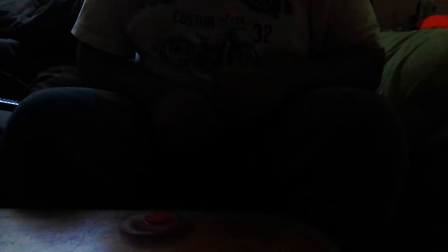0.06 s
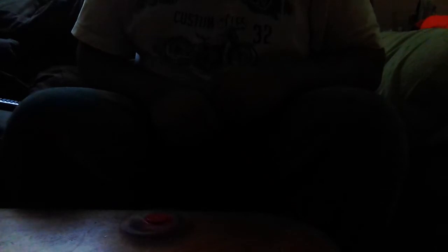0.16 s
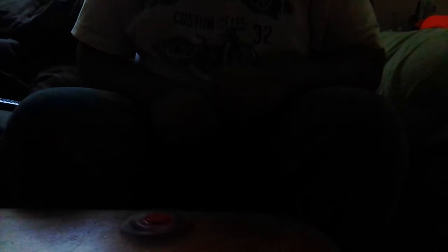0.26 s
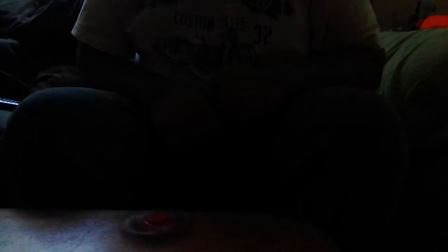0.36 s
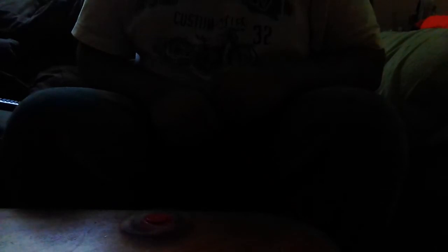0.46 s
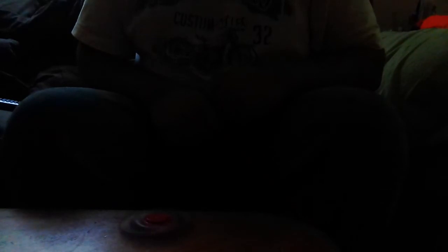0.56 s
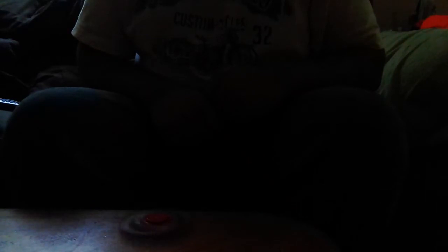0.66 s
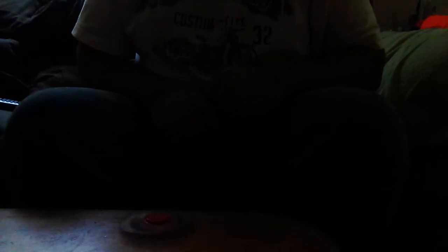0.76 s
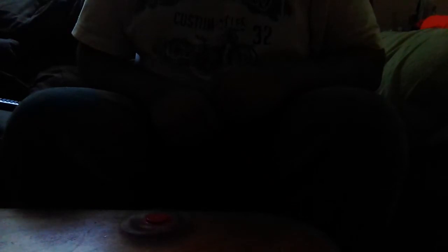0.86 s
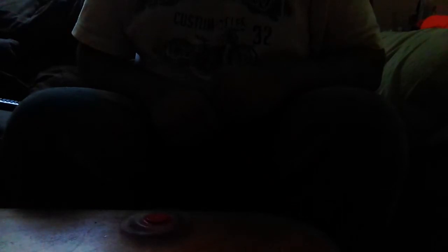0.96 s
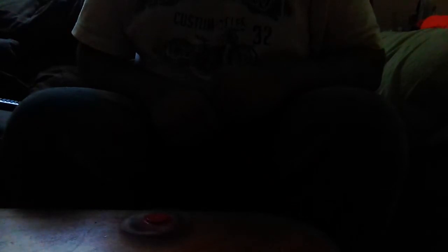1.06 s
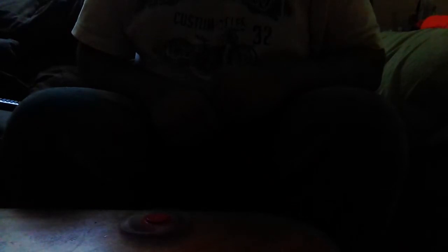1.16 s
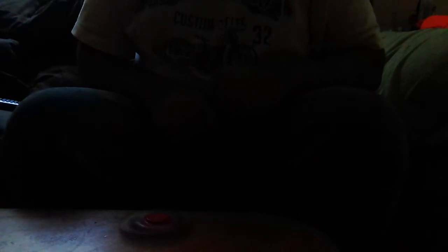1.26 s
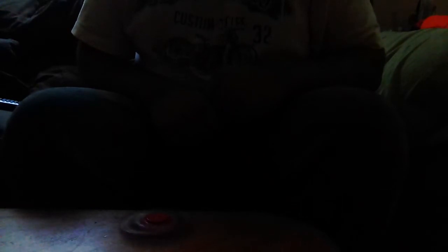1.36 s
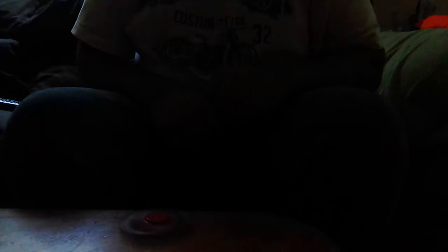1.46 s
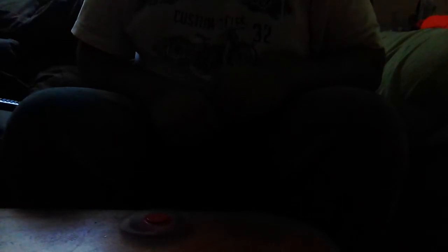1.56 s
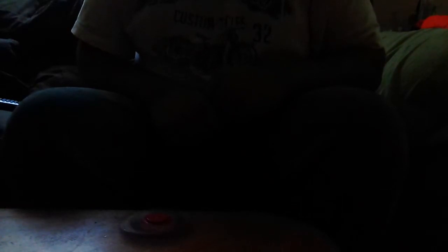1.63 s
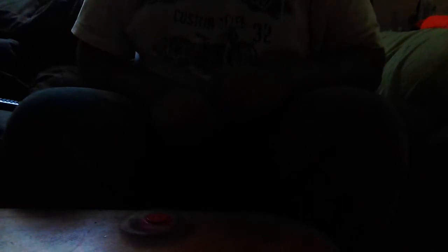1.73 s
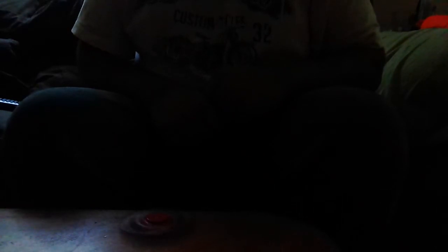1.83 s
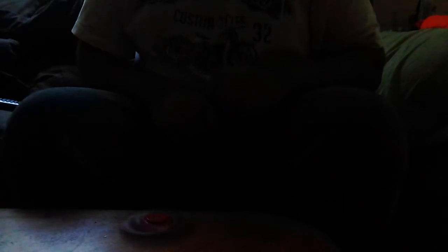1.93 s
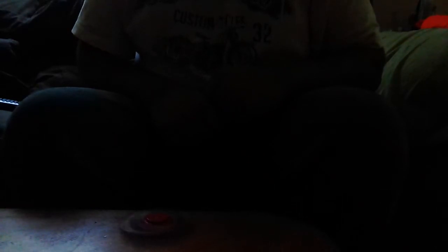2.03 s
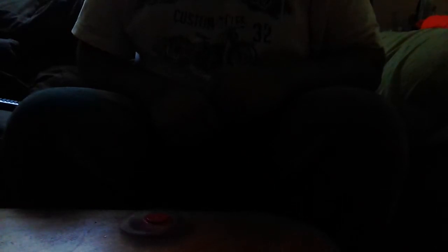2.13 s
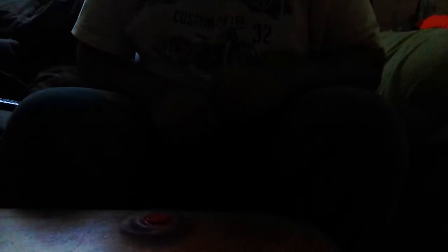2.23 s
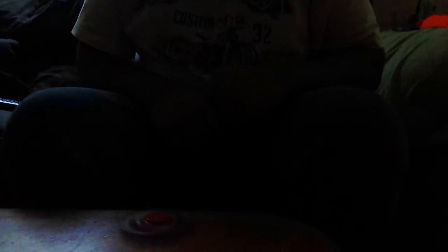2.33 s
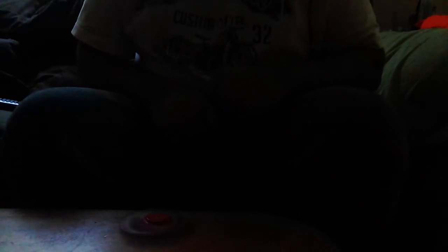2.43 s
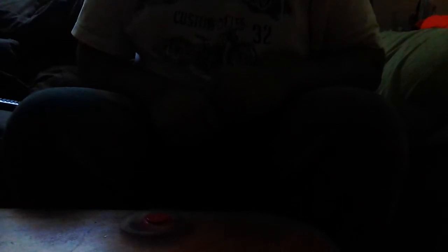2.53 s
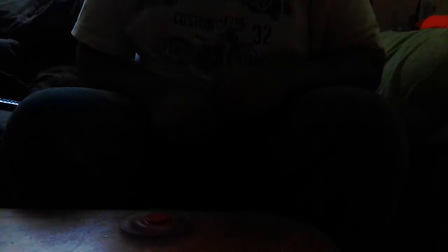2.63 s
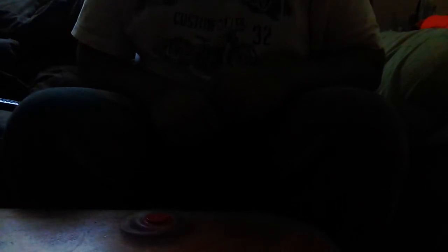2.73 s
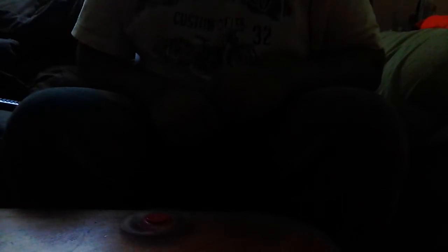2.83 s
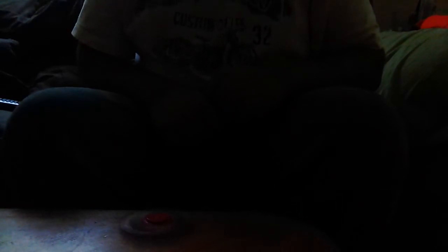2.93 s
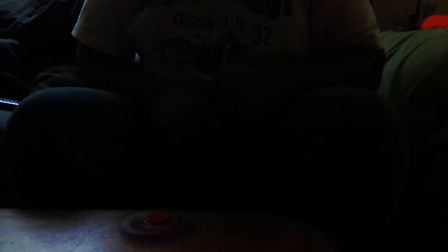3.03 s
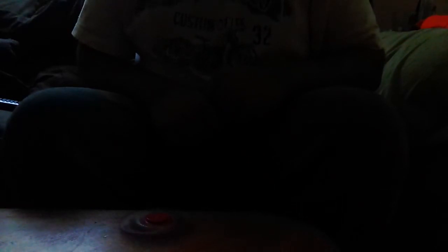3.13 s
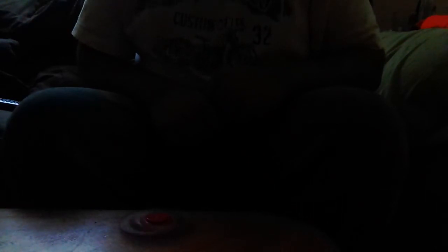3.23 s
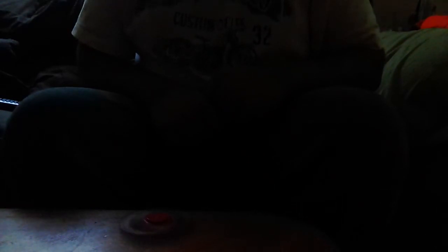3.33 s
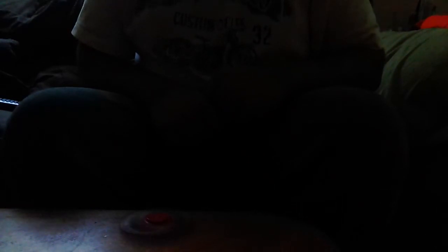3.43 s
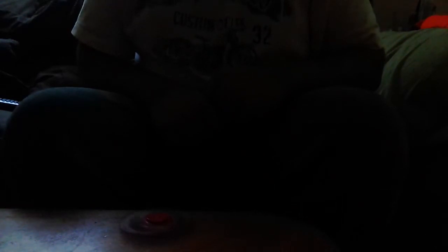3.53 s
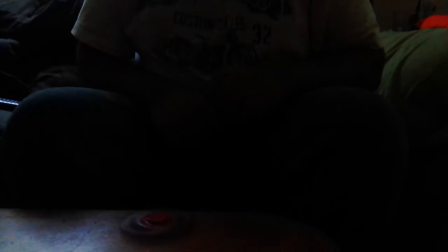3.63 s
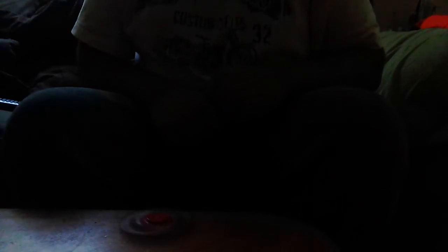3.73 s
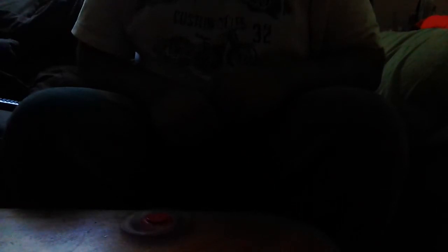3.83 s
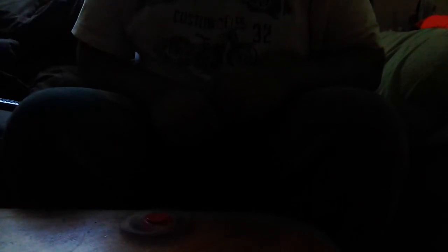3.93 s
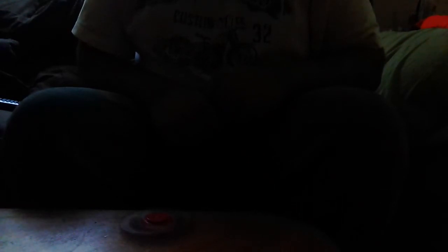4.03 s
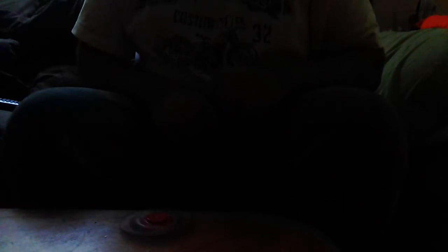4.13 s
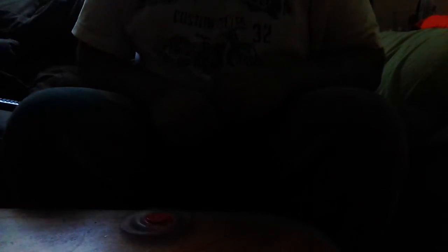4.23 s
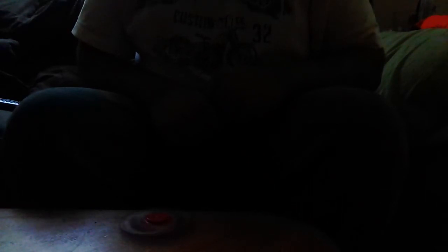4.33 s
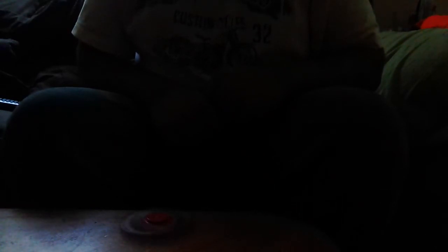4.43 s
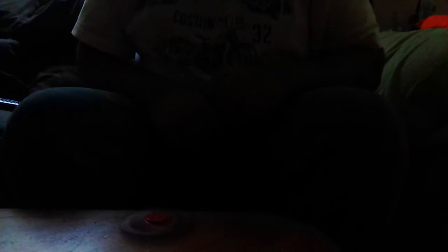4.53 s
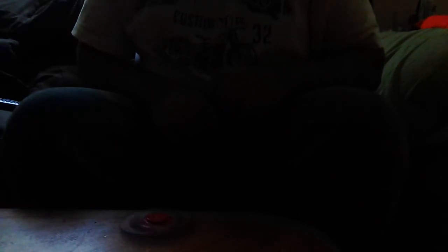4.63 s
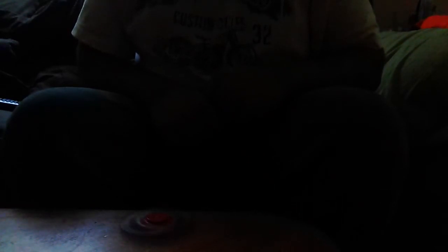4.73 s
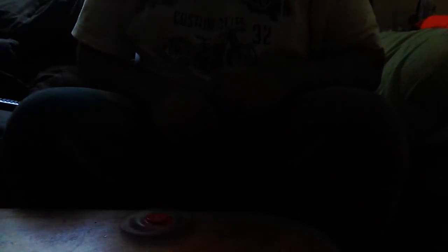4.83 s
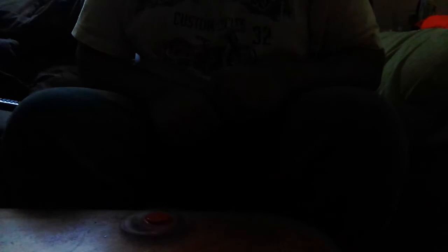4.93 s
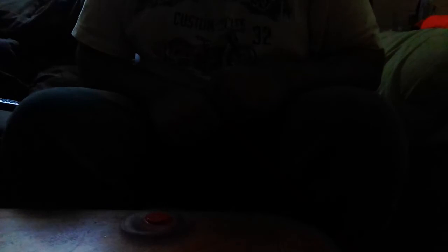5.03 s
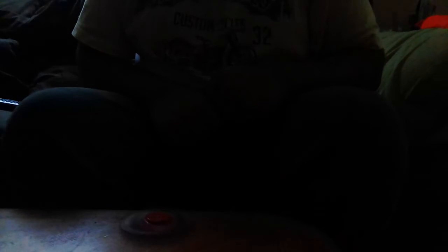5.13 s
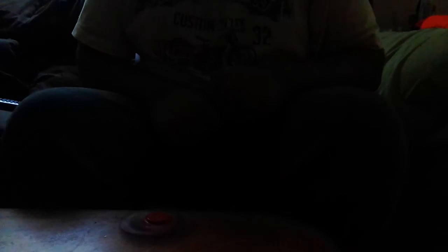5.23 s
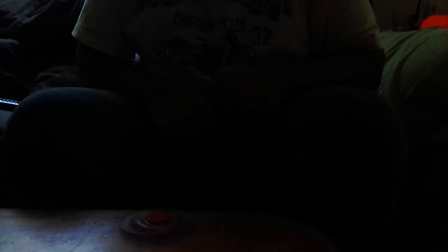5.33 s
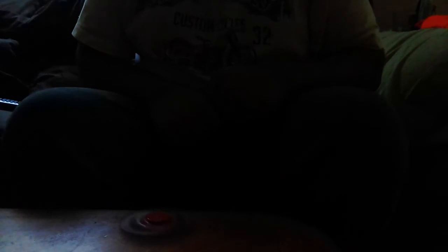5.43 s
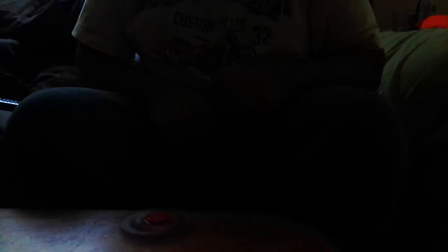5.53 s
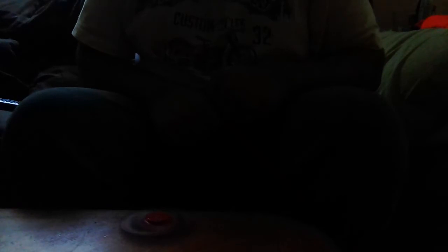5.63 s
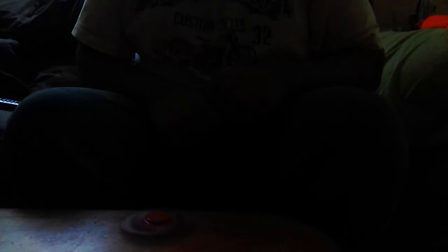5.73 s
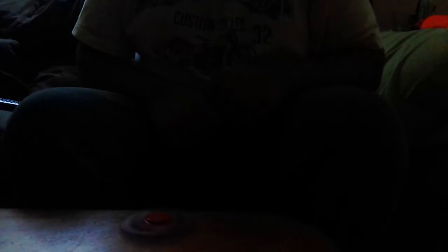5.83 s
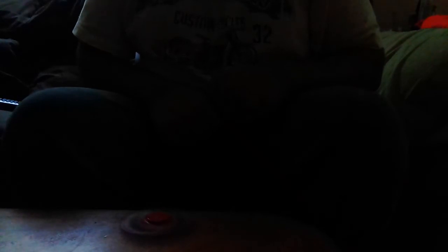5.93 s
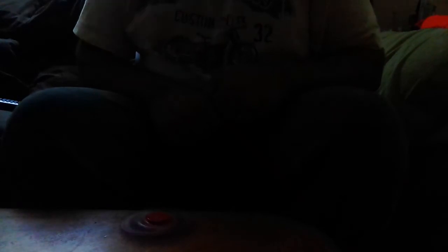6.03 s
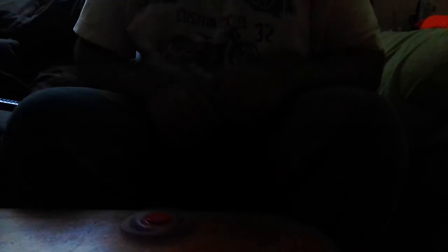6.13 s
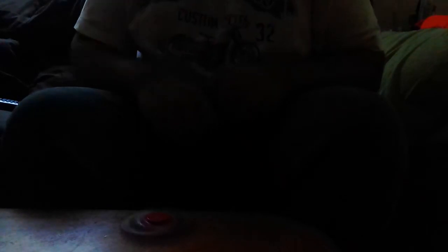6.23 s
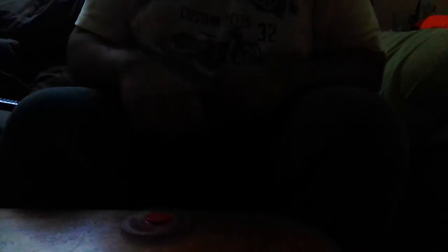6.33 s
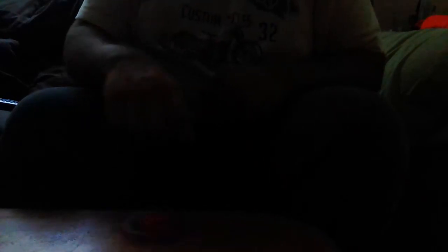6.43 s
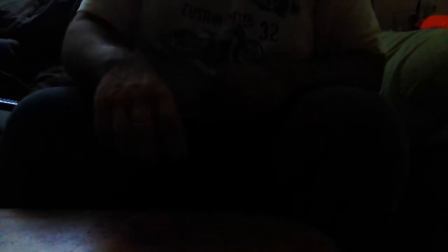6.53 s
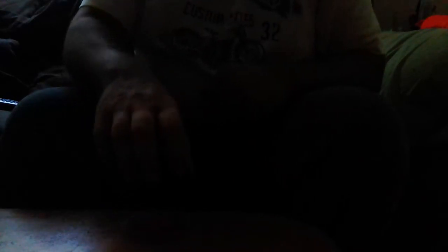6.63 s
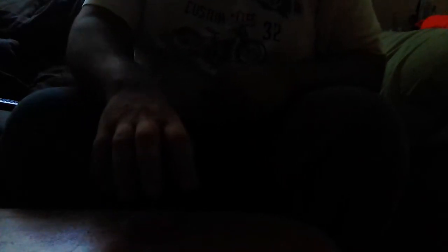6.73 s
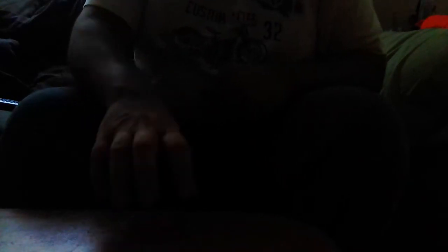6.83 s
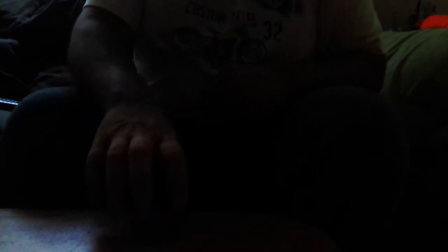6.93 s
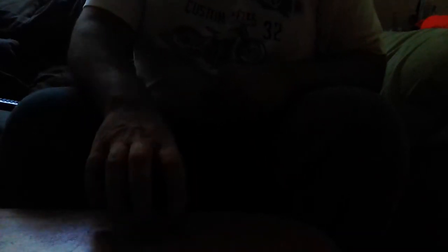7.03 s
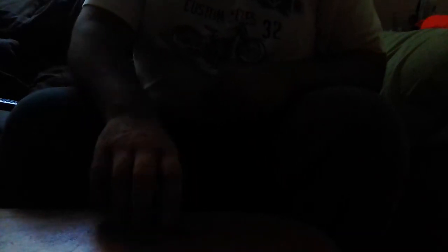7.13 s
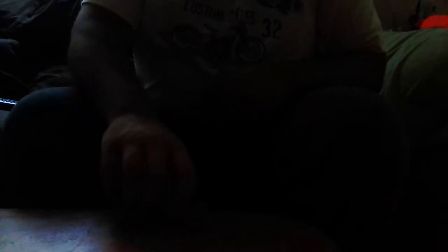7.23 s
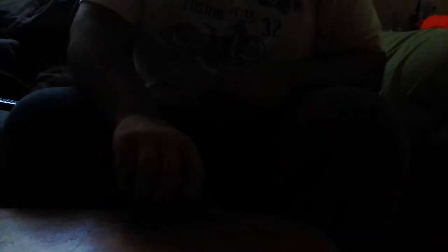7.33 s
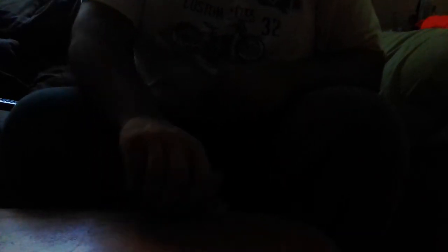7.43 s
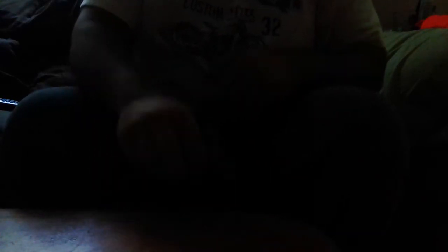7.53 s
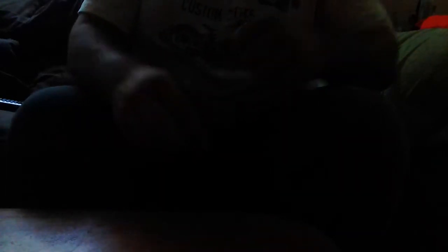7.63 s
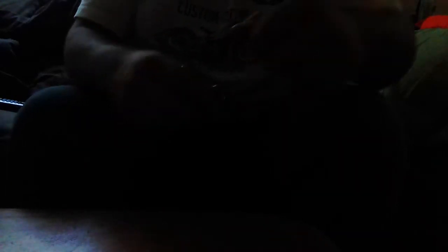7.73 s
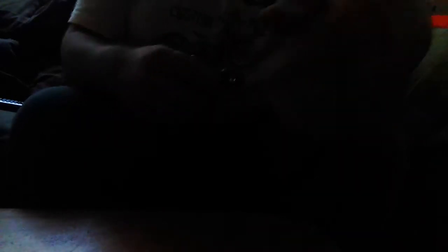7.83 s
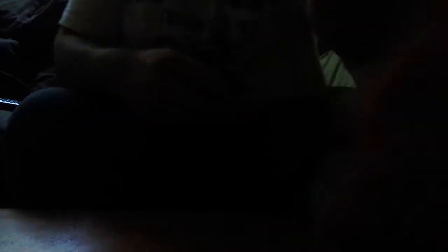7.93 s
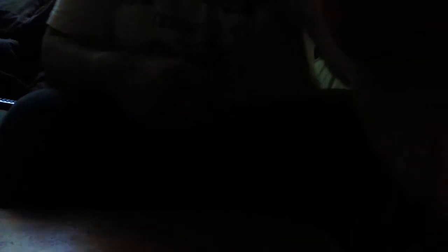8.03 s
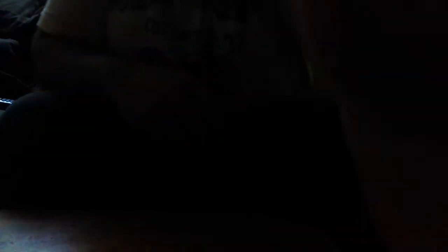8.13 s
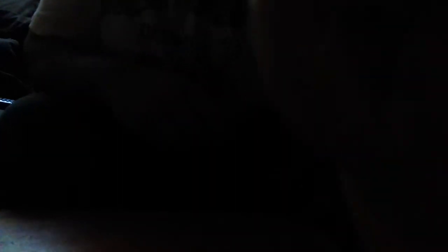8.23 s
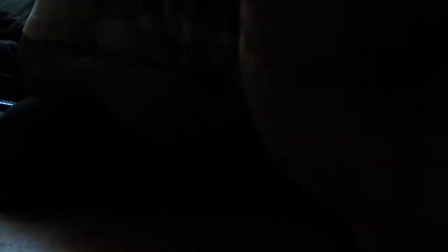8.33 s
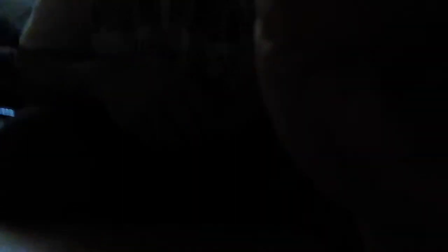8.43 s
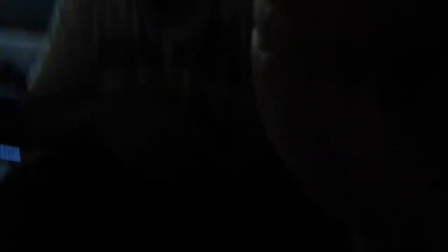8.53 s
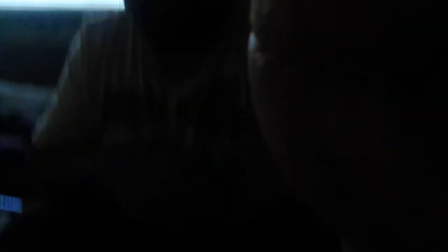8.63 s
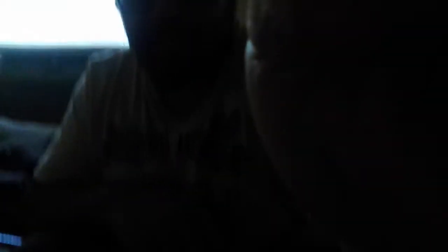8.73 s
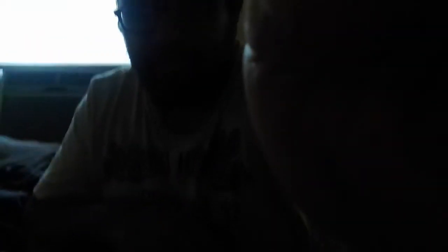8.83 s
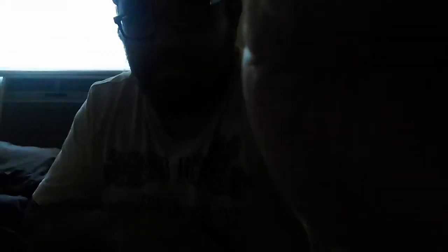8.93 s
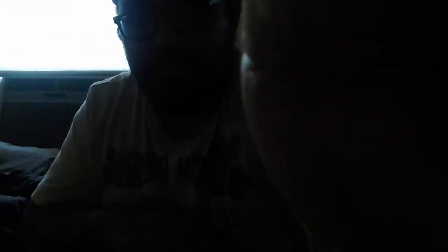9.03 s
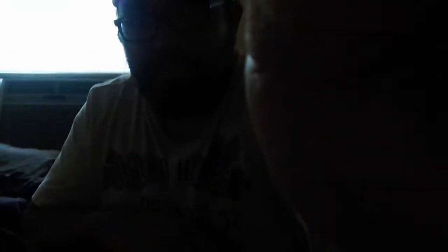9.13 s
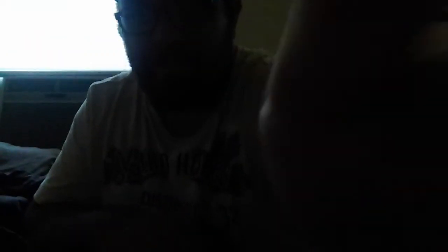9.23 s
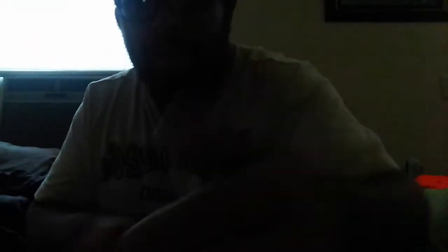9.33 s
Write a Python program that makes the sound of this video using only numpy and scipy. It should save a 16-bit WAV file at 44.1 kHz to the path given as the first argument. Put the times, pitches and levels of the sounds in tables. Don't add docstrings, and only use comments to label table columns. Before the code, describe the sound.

From 0 to about 7.2 seconds a toy spinner runs on a wooden table close to the microphone: a dry, grainy midrange whir of rattling balls, strongest around three kilohertz, throbbing about thirteen times a second at first and eleven by the end. It fades slightly and loses some brightness, with small plastic ticks and soft woody bumps standing out irregularly, and a slight extra touch near 5.7. At 7.19 a loud, sharp plastic knock cuts the whir instantly. The toy rocks and chatters until 7.3, then judders and scrapes over the wood, with another bright clack at 7.4 and a smaller one at 7.53. By 7.8 there is only subdued room air, low hum and a faint high whine. From 8.4 to 8.85 quiet taps, rubs and creaks come from fingers gripping the camera, with a few dull bumps again around 9.25 to 9.35.

```python
import sys
import numpy as np
from scipy import signal
from scipy.fft import rfft, irfft, next_fast_len
from scipy.io import wavfile
from scipy.ndimage import map_coordinates

SR = 44100
rng = np.random.default_rng(int(sys.argv[2]) if len(sys.argv) > 2 else 0)


def to_wav(sig):
    pcm = np.clip(np.atleast_2d(sig), -1, 1) * 32767
    pcm = np.round(pcm).astype(np.int16)
    wavfile.write(sys.argv[1], SR, pcm.T)


def how_loud(loudness_db):
    steps = np.asarray(loudness_db, float) / 20
    return 10 ** steps


N = 412776
TIME = np.arange(N) / SR


def unit(x):
    return x / np.sqrt(np.mean(x ** 2) + 1e-20)


def along(points, hz):
    f, *cols = np.transpose(points)
    return [np.interp(np.log(hz + 1), np.log(f + 1), c) for c in cols]


def curves(rows):
    s, *cols = np.transpose(rows)
    return [np.interp(TIME, s, c) for c in cols]


def wobble(rate):
    knots = rng.standard_normal(int(N * rate / SR) + 4)
    return map_coordinates(knots, [TIME * rate])


def coloured(x, shape_db):
    m = 2 * next_fast_len(N // 2 + 4096)
    gain = how_loud(shape_db(np.fft.rfftfreq(m, 1 / SR)))
    cepstrum = irfft(np.log(gain + 1e-7), m)
    cepstrum[1:m // 2] *= 2
    cepstrum[m // 2 + 1:] = 0
    return irfft(rfft(x, m) * np.exp(rfft(cepstrum)), m)[:N]


def through(x, spectrum):
    return coloured(x, lambda hz: along(spectrum, hz)[0])


def gritty(rate, spike_db, share):
    hits = rng.random(N) < rate / SR
    strength = how_loud(spike_db * np.clip(rng.standard_normal(N), -2, 2))
    contacts = hits * strength * rng.choice([-1, 1], N)
    return rng.standard_normal(N) + share * unit(contacts)


# (time [s], level [dB])
KNOCK = (7.18665, -8)
# (frequency [Hz], density [dB per Hz])
BEARING = [(88, -58.5), (150, -33), (310, -10), (409, -10), (452, -3), (634, -12), (942, -6.5), (1660, -6),
           (2140, -9.5), (2500, -6), (3090, 1), (3460, -2.5)]
RACE = [(4300, -12), (4500, -20), (5100, -13.5), (6150, -9.5), (6700, -19.5), (7300, -29.5), (7600, -42),
        (8000, -45.5), (8500, -39.5), (9150, -29.5), (9700, -50), (11500, -51.5), (13000, -83)]
# (frequency [Hz],
# width [Hz], # lift [dB])
MODES = [(355, 40, 3.5), (700, 14, 4.7), (754, 60, 1.4), (921, 28, 2.4), (953, 20, 5.3), (1125, 20, 2.0),
         (1163, 60, 3.6), (1270, 60, 3.6), (1340, 20, 2.1), (1486, 14, 3.1), (1529, 14, 3.3),
         (1604, 14, 2.4), (1663, 60, 3.5), (1873, 14, 2.1),
         (1916, 20, 5.3), (1981, 60, 2.8), (2040, 20, 5.5), (2234, 14, 2.6), (2272, 14, 2.9),
        (2331, 28, 4.8), (2390, 14, 5.8), (2428, 14, 2.5), (2439, 14, 6.1), (2514, 14, 7.1),
        (2649, 20, 4.3), (2735, 14, 1.9), (2767, 60, 4.8), (2848, 14, 1.9), (3025, 20, 4.9),
         (3106, 14, 2.1), (3155, 40, 2.9), (3219, 14, 2.5), (3316, 20, 1.6), (3332, 14, 4.2), (3354, 60, 2.8),
       (3375, 14, 3.4), (3408, 14, 2.8), (3440, 20, 3.8), (3483, 14, 2.3), (3666, 40, 2.0), (3817, 28, 2.6),
       (3908, 90, 3.4), (3967, 20, 2.5), (4016, 28, 2.0),
         (528, 20, -4.0), (824, 40, -4.5), (1464, 14, -4.8), (1760, 28, -4.5), (2250, 14, -3.6),
           (2358, 20, -2.2), (2476, 14, -4.9), (2595, 28, -3.5), (2885, 40, -3.0), (3085, 14, -5.9),
           (3192, 14, -6.6), (3252, 20, -4.3), (3295, 14, -3.3), (3542, 20, -2.4),
         (445, 22, 3), (1250, 20, 2.5), (2762, 14, 2.5), (3122, 14, -3.5)]


def resonances(whir):
    modes = MODES
    knots = rng.standard_normal(SR // 25)

    def shape_db(hz):
        modes_db = sum(1.15 * db / (1 + (2 * (hz - centre) / width) ** 4) for centre, width, db in modes)
        grain_db = .9 * map_coordinates(knots, [hz / 13])
        return modes_db + grain_db

    ringing = coloured(whir, shape_db)
    return ringing * np.std(whir) / np.std(ringing)


SPIN_HZ, SLOWING, FIRST_TURN = 13, .286, -.59
BALL_ORDER = 2.63
# (frequency [Hz], depth [dB], lead [turns])
THROB = [(400, 1.2, -.12), (750, .8, 0), (1050, 1.8, .02), (1350, 1.6, .05), (1650, 2.8, .05),
         (2200, .9, -.02), (2850, .6, -.02), (3150, 1.7, .03), (3450, 4.6, .06), (4250, 5.4, .05),
         (4700, 1, 0), (5400, .6, -.4), (6300, .5, -.05), (9000, 1.2, .4)]
# (time [s], share [1])
UNBALANCE = [(0, 1.1), (.7, .85), (1.2, .85), (2, 1), (2.8, 1.25), (3.8, 1), (4.7, 1.1), (5.3, .7),
             (6.1, .7), (7.2, .75)]


def rotation_db(hz, t):
    turns = FIRST_TURN + SPIN_HZ * t - SLOWING * t * t / 2
    depth_db, lead = [c[:, None] for c in along(THROB, hz)]
    angle = 2 * np.pi * (turns + lead)
    share = np.interp(t, TIME, curves(UNBALANCE)[0])
    throb_db = depth_db * share * (np.cos(angle) - .3 * np.cos(2 * angle))
    lobes_db = .8 * (hz[:, None] > 4500) * np.cos(2 * np.pi * (3 * turns - .2))
    balls_db = 0.75 * (hz[:, None] < 2500) * np.cos(2 * np.pi * (BALL_ORDER * turns + 0.48))
    return throb_db + lobes_db + balls_db


# (time [s], level [dB])
WHIR = [(0, -43), (.4, -44), (1.2, -44.5), (2.2, -45.5), (3.6, -44.5), (4.1, -46), (5.2, -47), (5.7, -46),
        (7.17, -47)]
# (level over the load [dB], share of load swings [1], loss [dB per turn/s lost])
PARTS = [
    (-6, 0.79, -0.2),
    (-2, 1, 0.5),
    (-9, 0.39, 1.2),
    (-32, 0.83, 2.5),
]


def bearing():
    load_db = curves(WHIR)[0]
    mean_db = np.mean(np.transpose(WHIR)[1])
    lost = SLOWING * (TIME - KNOCK[0] / 2)
    rattle = gritty(1500, 3.5, 0.78) * how_loud(0.096 * wobble(35) + 0.88 * wobble(90))
    hz, t, z = signal.stft(through(rattle, BEARING + RACE), SR, nperseg=256, noverlap=192)
    z = z * how_loud(rotation_db(hz, t))
    part = np.digitize(hz, [2400, 4400, 7500])
    whir = 0
    for k, (db, share, loss_db) in enumerate(PARTS):
        layer = signal.istft(z * (part == k)[:, None], SR, nperseg=256, noverlap=192)[1][:N]
        level_db = mean_db + db + share * (load_db - mean_db) - loss_db * lost
        whir = whir + how_loud(level_db) * unit(layer)
    return resonances(whir) * np.clip((KNOCK[0] - TIME) / 0.0034, 0, 1)


# (frequency [Hz], level [dB], t60 [s])
PLASTIC = [(1230, -7.5, 0.018), (1940, -24, 0.0792), (2676, -19.5, 0.0451), (3310, 0, 0.0064),
           (3846, -19, 0.05), (6000, -17.5, .008)]


def knock():
    t = np.clip(TIME - KNOCK[0], 0, None)
    ring = sum(how_loud(db - 60 * t / t60) * np.sin(2 * np.pi * hz * t) for hz, db, t60 in PLASTIC)
    burst = how_loud(-60 * t / 0.024) * (t > 0) * rng.standard_normal(N)
    crack = through(burst, BEARING + RACE)
    return how_loud(KNOCK[1] + 1) * (1 - np.exp(-t / 0.00024)) * (ring + 0.1199 * crack)


# (time [s], level [dB], frequency [Hz])
TABLE_THUDS = [(0.381, -42, 110), (5.65, -57, 200), (7.18, -28, 600), (7.187, -30, 189), (7.186, -25, 480),
               (7.19, -38, 91.5), (7.202, -30, 205), (7.384, -45, 98), (7.399, -24, 1120),
               (7.531, -30, 800), (7.657, -46.5, 738)]
GRIP_THUDS = [(8.437, -49.5, 890), (8.441, -57, 373), (8.526, -56, 648), (8.547, -48, 1100),
              (8.658, -47, 626), (8.783, -46, 485), (9.241, -43, 1074), (9.2702, -39.5, 337),
              (9.27, -51, 590), (9.289, -45, 217), (9.33, -49, 400)]


def thuds():
    t, out = np.arange(SR // 6) / SR, np.zeros(N + SR)
    modes = [(.78, 0.24), (1, 0.57), (1.3, 0.22), (1.9, 0.21), (2.7, 0.091)]
    for s, db, hz in TABLE_THUDS + GRIP_THUDS:
        ring = sum(g * np.sin(2 * np.pi * k * hz * t) for k, g in modes)
        t60 = 0.033 * (500 / hz) ** 0.71
        out[round(s * SR):][:len(t)] += how_loud(db - 60 * t / t60) * (1 - np.exp(-t / 0.00081)) * ring
    return out[:N]


# (time [s], level [dB], frequency [Hz])
TABLE_TICKS = [(5.65, -50, 5200), (7.18, -39, 4500), (7.187, -48.5, 8500), (7.212, -31, 5260),
               (7.24, -35, 4900), (7.264, -30, 5500), (7.283, -38, 6000), (7.297, -41, 6500),
               (7.338, -46, 6040), (7.379, -38, 5000), (7.3984, -16, 4380), (7.3988, -45, 2330),
               (7.532, -33.5, 5270), (7.535, -32, 3120)]
GRIP_TICKS = [(8.4, -74, 5000), (8.438, -57, 1700), (8.439, -70, 8450), (8.462, -47, 8700),
              (8.462, -65, 2980), (8.529, -59, 2900), (8.547, -48, 1900), (8.554, -46, 4530),
              (8.556, -50, 3010), (8.657, -62, 3900), (9.241, -53, 2100), (9.241, -47, 4900),
              (9.27, -55.5, 1200), (9.27, -58, 4000), (9.33, -62, 7000), (9.334, -56, 7000),
              (9.342, -58, 6800), (9.358, -58, 4000)]


def ticks():
    t, out = np.arange(SR // 50) / SR, np.zeros(N + SR)
    modes = [(.5, .3), (.68, 0.94), (1, .8), (1.25, .7), (1.45, 0.2)]
    for s, db, hz in TABLE_TICKS + GRIP_TICKS:
        crack = sum(g * np.sin(2 * np.pi * k * hz * t) for k, g in modes)
        out[round(s * SR):][:len(t)] += how_loud(db + 3.5 - 60 * t / 0.0022) * (1 - np.exp(-t / 0.00022)) * crack
    return out[:N]


def pings(rows, lift_db, t60, rise):
    t, out = np.arange(SR // 12) / SR, np.zeros(N + SR)
    for (s, db, hz), (side, turn) in zip(rows, rng.random((len(rows), 2))):
        neighbour_hz = hz * (.85 + .3 * side)
        ring = np.sin(2 * np.pi * hz * t) + 0.38 * np.sin(2 * np.pi * (neighbour_hz * t + turn))
        out[round(s * SR):][:len(t)] += how_loud(db + lift_db - 60 * t / t60) * (1 - np.exp(-t / rise)) * ring
    return out[:N]


CATCHES = [(0.033, -30.5, 3400), (0.113, -33, 3400), (0.195, -35, 3500), (0.211, -35, 3170),
           (0.28, -44, 3130), (0.37, -39, 3400), (0.415, -39, 3400), (0.499, -43, 3080),
           (0.51, -33.5, 3470), (0.769, -37, 3300), (0.796, -37, 3000), (0.826, -38, 3380),
           (0.977, -39, 3300), (1.232, -38, 3040), (1.517, -36, 3520), (1.543, -39, 3400),
           (1.584, -43, 2710), (1.666, -40, 3300), (1.683, -41, 3400), (1.833, -35, 3200),
           (1.849, -43, 3100), (2.389, -37, 3320), (2.407, -45, 3240), (2.434, -45, 3150),
           (2.832, -34, 3400), (3.155, -41, 3100), (3.238, -45, 3300), (3.295, -37, 3500),
           (3.312, -39, 3460), (3.382, -43, 3420), (3.471, -38, 3420), (3.49, -36, 3480),
           (3.566, -34.5, 3540), (3.65, -35, 3410), (3.818, -45, 3470), (3.988, -40, 3360),
           (4.644, -39, 3360), (6.063, -40, 2970)]
BUMPS = [(0.136, -46, 1180), (0.196, -47, 945), (0.258, -47, 1470), (0.507, -46, 1670), (0.563, -48, 945),
         (0.955, -46, 1490), (1.124, -44, 1105), (1.268, -45, 1134), (1.606, -47, 1590), (1.664, -49, 1660),
         (1.832, -47, 1020), (2.402, -47, 1830), (2.804, -51, 1630), (2.983, -41, 1310), (3.31, -46, 1690),
         (3.382, -51, 1230), (4.302, -46, 1640), (5.676, -44, 1295)]
KNOCKS = [(7.197, -33.5, 1130), (7.198, -37, 560), (7.206, -39, 1390), (7.211, -25, 944),
          (7.212, -38.5, 1360), (7.225, -36.5, 564), (7.23, -37, 706), (7.236, -36, 690),
          (7.238, -35.5, 1280), (7.239, -45, 344), (7.246, -43, 1180), (7.249, -39, 303), (7.257, -45, 430),
          (7.262, -38.5, 1040), (7.266, -42, 1230), (7.273, -41, 725), (7.281, -38, 940), (7.29, -37, 1050),
          (7.295, -39.5, 324)]
CHATTER = [(7.191, -39.5, 5440), (7.196, -36, 5900), (7.198, -32, 3360), (7.203, -36, 2650),
           (7.206, -35.5, 3600), (7.206, -35.5, 5100), (7.213, -44.5, 6740), (7.213, -37, 5200),
           (7.214, -25, 2050), (7.223, -27.5, 2560), (7.231, -38, 3450), (7.235, -34, 2070),
           (7.235, -40.5, 6200), (7.236, -38.5, 3480), (7.24, -40, 3940), (7.24, -33.5, 2900),
           (7.246, -33, 2230), (7.25, -42, 2130), (7.257, -36, 2760), (7.263, -38, 3470),
           (7.263, -36, 1770), (7.267, -36.5, 3040), (7.269, -37, 1970), (7.276, -45.5, 2480),
           (7.281, -46, 2580), (7.287, -44.5, 2690), (7.292, -46, 2650), (7.297, -41.5, 2580),
           (7.299, -39.5, 6300), (7.3, -50, 2070), (7.309, -42, 2500), (7.318, -42, 2010)]
JUDDER = [(7.329, -51, 280), (7.334, -41, 820), (7.348, -39, 460), (7.356, -40, 390), (7.364, -53, 800),
          (7.365, -37, 420), (7.371, -39, 685), (7.373, -40, 397), (7.38, -30.5, 1140), (7.383, -34, 586),
          (7.389, -44, 1120), (7.389, -38, 386), (7.395, -33, 365), (7.397, -28.5, 1145), (7.412, -39, 547),
          (7.413, -40, 1320), (7.423, -45, 1310), (7.425, -39, 826), (7.432, -42, 367), (7.433, -49, 710),
          (7.434, -52, 1550), (7.446, -40, 840), (7.457, -42, 500), (7.458, -43, 1310), (7.464, -49, 1160),
          (7.468, -48, 800), (7.47, -41, 1200), (7.476, -38, 1150), (7.482, -44, 680), (7.484, -43, 1140),
          (7.488, -41, 600), (7.498, -48, 1270), (7.499, -43, 695), (7.514, -42, 624), (7.53, -40, 1280),
          (7.534, -31.5, 793), (7.547, -39, 710), (7.559, -43, 500), (7.571, -49, 785), (7.577, -46, 820)]
CREAKS = [(8.527, -55, 653), (8.534, -56.5, 650), (8.547, -60, 554), (8.545, -66, 1080), (8.546, -58, 1640),
          (8.553, -58, 1375), (8.56, -60, 800), (8.566, -62, 695), (8.574, -61, 750), (8.578, -66, 447),
          (8.585, -59, 670), (8.6, -58, 704), (8.61, -55, 600), (8.62, -61, 667), (8.635, -59, 796),
          (8.64, -62, 560), (8.66, -46.5, 335), (8.677, -54.5, 278), (8.676, -54.5, 609), (8.689, -63, 538),
          (8.697, -56.5, 605), (8.715, -59, 600), (8.731, -70, 690), (8.74, -61, 370), (8.768, -62, 410),
          (8.785, -54, 365), (8.793, -58, 445), (8.804, -54.5, 275), (8.814, -62, 500), (8.833, -62, 406)]


def contacts():
    spinning = pings(CATCHES, 3.5, 0.022, .0005) + pings(BUMPS, 4.1, 0.054, 0.0022)
    stopping = pings(KNOCKS, 4.9, 0.043, 0.0021) + pings(CHATTER, 6.5, .013, .0004)
    dragging = pings(JUDDER, 6.5, 0.034, 0.002)
    gripping = pings(np.add(CREAKS, [-.0015, 0, 0]), 3.7, 0.039, 0.0005)
    return spinning + stopping + dragging + gripping


# (full pressure [s], hold [s], release t60 [s], level [dB], brightness [dB])
STROKES = [(7.192, .002, 0.16, -29.5, 1), (7.212, 0.036, 0.73, -38, 2), (7.356, .03, 0.23, -50, -14),
           (7.39, 0.02, 0.4, -35.5, -13), (7.458, 0.026, 0.29, -41, -9), (7.531, 0.019, 0.45, -42, -16),
           (7.615, .01, 2.7, -61.5, -5), (8.3, .1, 1, -80, -1), (8.538, 0.078, 1.13, -59, -12.5),
           (8.681, 0.028, 1.3, -65.5, -12.5), (8.809, 0.0091, 1.5, -73, -10), (9.244, .05, 0.55, -70, -20),
           (9.355, 0.046, .3, -73, 2.5)]


def pressure(level_db, share, stretch):
    power = 0
    for s, hold, t60, db, bright_db in STROKES:
        build = np.exp(np.minimum(TIME - s, 0) / 0.019)
        release_db = -60 * np.maximum(TIME - s - hold, 0) / (stretch * t60)
        power = power + (build * how_loud(db + level_db + share * bright_db + release_db)) ** 2
    return np.sqrt(power)


# (frequency [Hz], density [dB per Hz])
DRAG = [(71, -52.5), (120, -28), (229, -21.5), (340, -1), (413, -9), (737, -2), (1270, -10), (1900, -17.5),
        (2470, -41.5), (4180, -120)]
SCUFF = [(710, -36.5), (1200, -6), (1400, -4.5), (1920, -2.5), (2230, -4), (2750, -4.5), (4800, -16.5),
         (6240, -51.5), (10600, -120)]
RUSTLE = [(2500, -32), (4200, -7), (5500, 5), (7200, -3.5), (7700, -14), (9200, -10.5), (9900, -28),
          (12000, -35.5), (13500, -50)]
# (level [dB], share of brightness [1], release stretch [1])
RUBS = [
    (-4.5, 0.043, 0.96),
    (-3, 1, .8),
    (-14, 1.5, 1.1),
]


def hand():
    clumps = wobble(50)
    rubbing = 0
    for rub, spectrum in zip(RUBS, (DRAG, SCUFF, RUSTLE)):
        grains = through(gritty(900, 3, .7), spectrum)
        layer = grains * how_loud(1.5 * clumps + 1.2 * wobble(90))
        rubbing = rubbing + pressure(*rub) * unit(layer)
    return rubbing * np.clip((TIME - KNOCK[0]) / .003, 0, 1)


# (time [s], length [s], frequency
# [Hz], width [Hz], level [dB])
PUFFS = [(7.999, 0.18, 5800, 2620, -87.5), (7.665, 0.15, 6000, 2820, -73), (9.308, 0.064, 110, 59.6, -68.5),
         (0.066, 0.24, 212, 55.56, -68.5), (0.403, 0.071, 180, 160, -72), (5.102, 0.053, 850, 27.78, -55.5),
         (5.678, 0.033, 3830, 4800, -54), (5.707, 0.051, 252, 270, -60), (7.2, 0.014, 11500, 1500, -68),
         (7.782, .025, 7300, 990, -81), (7.806, 0.01, 8180, 895, -77), (8.314, 0.048, 7420, 3200, -81.5),
         (9.1, .3, 2660, 220, -86), (8.6, 0.06, 3450, 600, -79), (8.601, 0.093, 1660, 430, -73),
         (9.35, 0.023, 1730, 300, -68.5)]


def cloth():
    out, t = np.zeros(N + 2 * SR), np.arange(-SR, SR) / SR
    f = np.fft.rfftfreq(len(t), 1 / SR)
    for s, length, hz, width, db in PUFFS:
        swell = np.exp(-(t / length) ** 2)
        band = 1 / (1 + (2 * (f - hz) / width) ** 4)
        brush = swell * irfft(rfft(rng.standard_normal(len(t))) * band)
        out[round(s * SR):][:len(t)] += how_loud(db) * brush * np.linalg.norm(swell) / np.linalg.norm(brush)
    return out[SR:N + SR]


# (frequency [Hz], t60 [s])
WALLS = [(200, 0.515), (2000, 0.42), (10000, 0.049)]


def walls(x):
    hz, t, z = signal.stft(rng.standard_normal(SR // 2), SR, nperseg=256)
    decay = how_loud(-60 * t / along(WALLS, hz)[0][:, None])
    tail = signal.istft(z * decay, SR, nperseg=256)[1]
    return signal.fftconvolve(np.pad(x, (200, 0)), tail / np.linalg.norm(tail))[:N]


# (frequency [Hz], density [dB per Hz])
AIR = [(15, -26.5), (40, -12), (80, -5), (300, -5.5), (600, -2), (1400, -11.5), (2500, -20), (4000, -32.5),
       (5200, -34), (6200, -35), (7500, -46), (9000, -52), (9500, -50.5), (15700, -49.5)]
# (frequency [Hz], level [dB rms])
TONES = [(10250, -108), (10729, -106), (11203, -107), (11326, -108), (11563, -106), (11682, -96),
         (11800, -97), (14664, -109),
         (76, -76.5), (112.6, -79.5), (1626, -92), (2078, -95), (2595, -92), (2654, -86), (2708, -94),
       (4888, -96), (5362, -94), (5841, -85), (5959, -99), (6320, -103)]
# (time [s], level [dB])
GAIN = [
    (0, 0),
    (7.5, 0),
    (7.9, -7),
    (9.36, -7),
]


def room():
    air = how_loud(-65) * unit(through(rng.standard_normal(N), AIR))
    tones = 0
    for hz, db in TONES:
        level = how_loud(db + 2 + 1.5 * wobble(8))
        tones = tones + level * np.sin(2 * np.pi * (hz * TIME + .14 * wobble(9)))
    gain_db = curves(GAIN)[0]
    return how_loud(0.64 * gain_db) * air + how_loud(gain_db) * tones


# (frequency [Hz], gain [dB])
MIC = [(40, -17), (150, -3.5), (300, 3), (7200, 2), (7800, -9.5), (9300, -8), (10000, -26.5),
       (12300, -26.5), (13000, -55)]
# (frequency [Hz], gain [dB])
APART = [(30, -34), (100, -18.5), (400, -28.5), (1500, -30.5), (3000, -34.5), (6000, -29.5), (9000, -30)]


def scene():
    blows = through(knock() + thuds() + ticks(), MIC)
    steady = bearing() + room()
    mid = steady + blows + how_loud(-11.5) * walls(blows) + hand() + cloth() + contacts()
    side = through(np.roll(steady, 150), APART)
    return np.array([mid + side, mid - side])


def band_limit(x):
    return signal.sosfilt(signal.butter(12, 15720, fs=SR, output="sos"), x)


def record(dry):
    hiss = .9 * rng.standard_normal(dry.shape) + .55 * rng.standard_normal(N)
    hiss_level = how_loud(-86.5 + 0.2 * curves(GAIN)[0])
    return band_limit(dry - .0006 + hiss_level * hiss)


dry = scene()
out = record(dry)
to_wav(out)
```